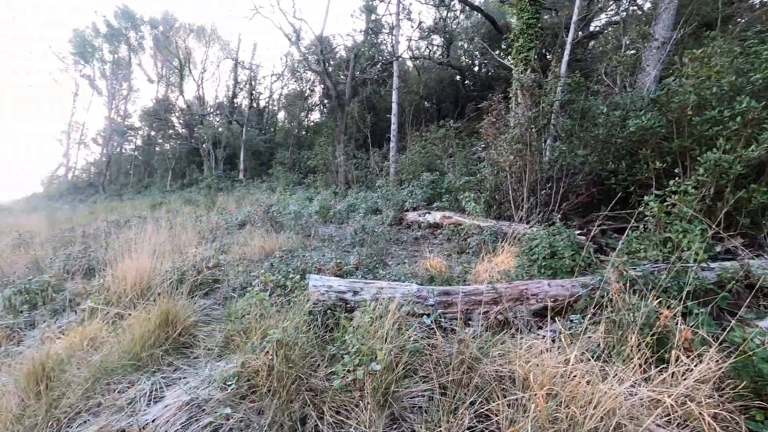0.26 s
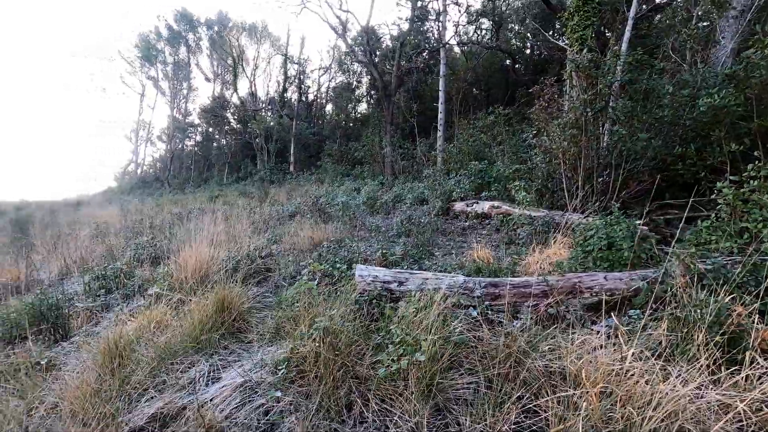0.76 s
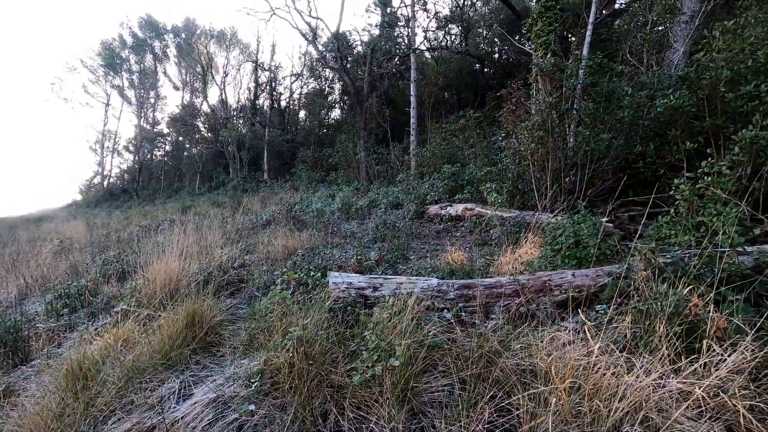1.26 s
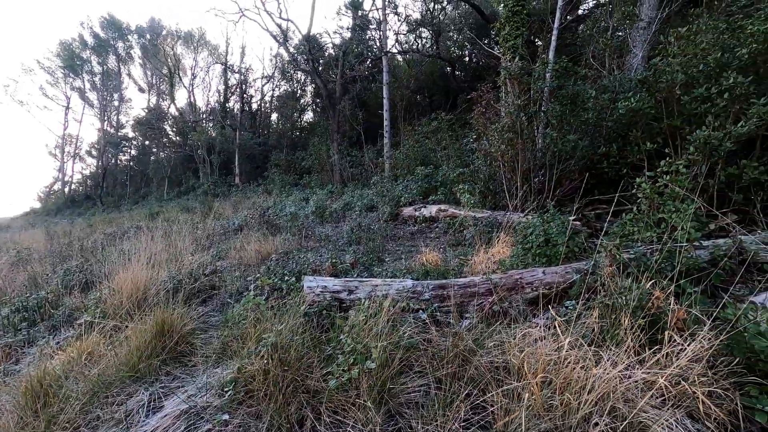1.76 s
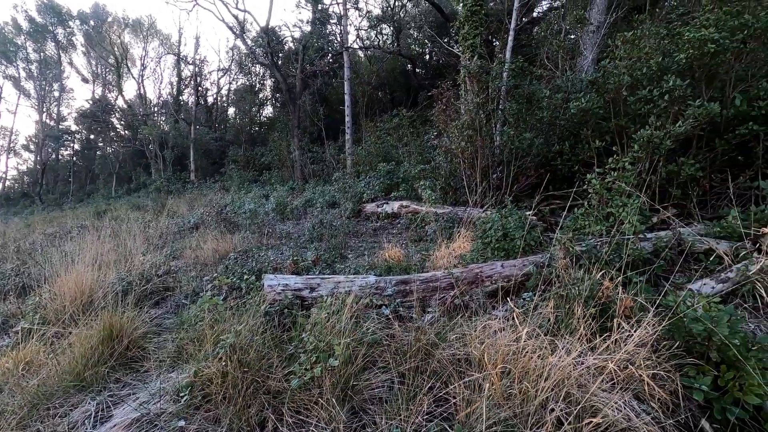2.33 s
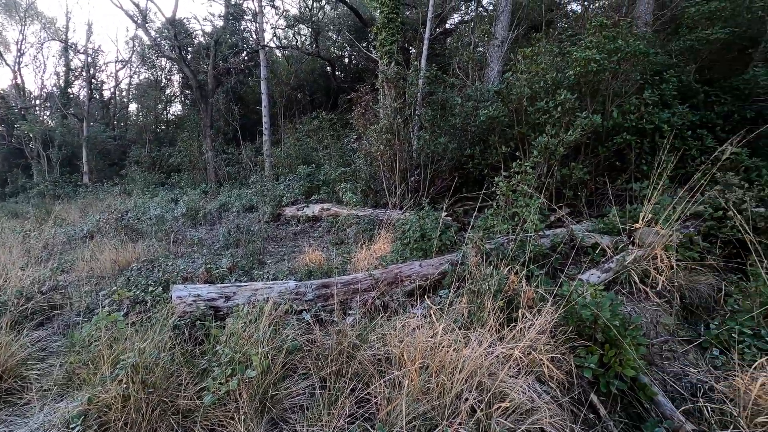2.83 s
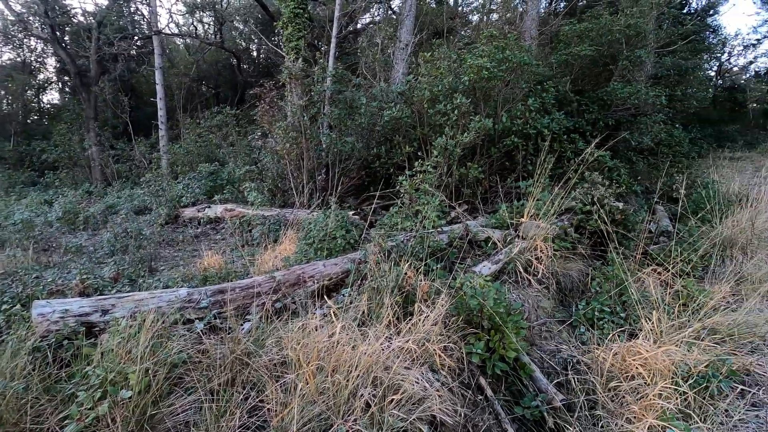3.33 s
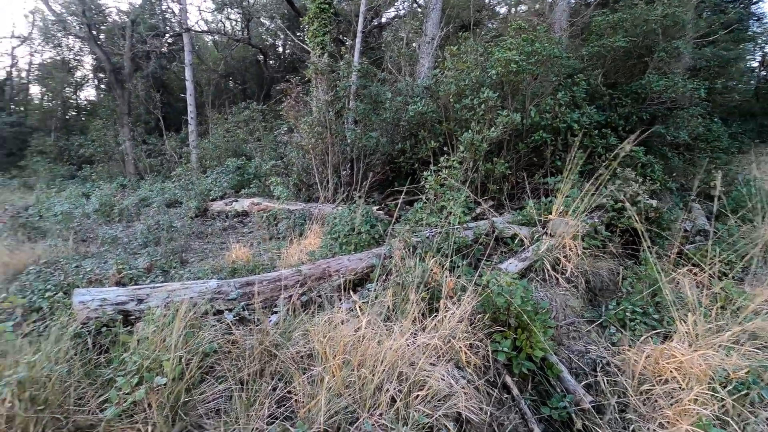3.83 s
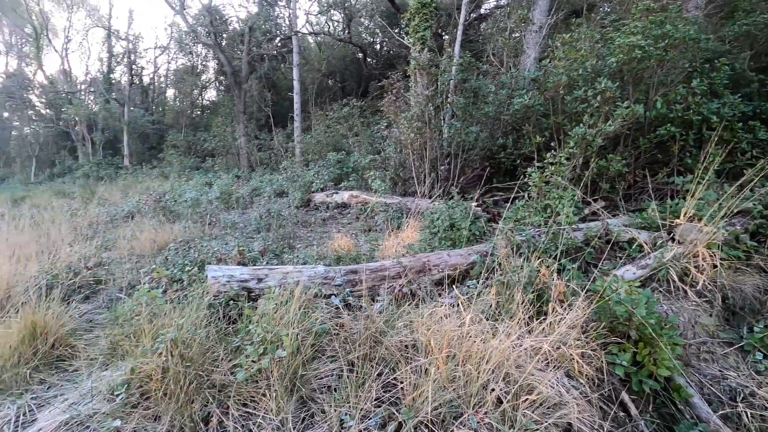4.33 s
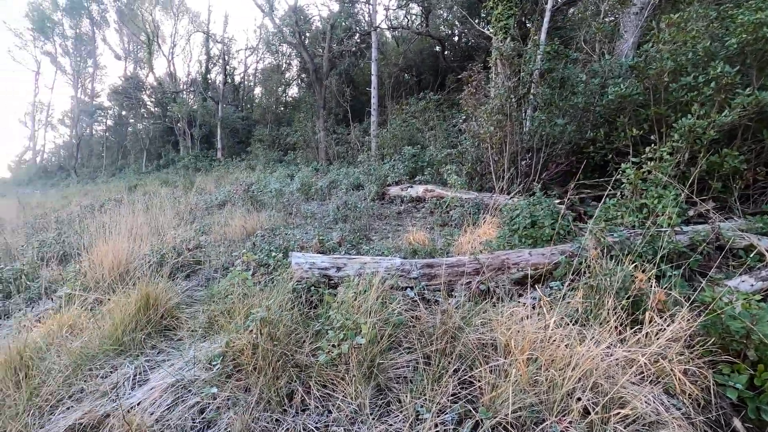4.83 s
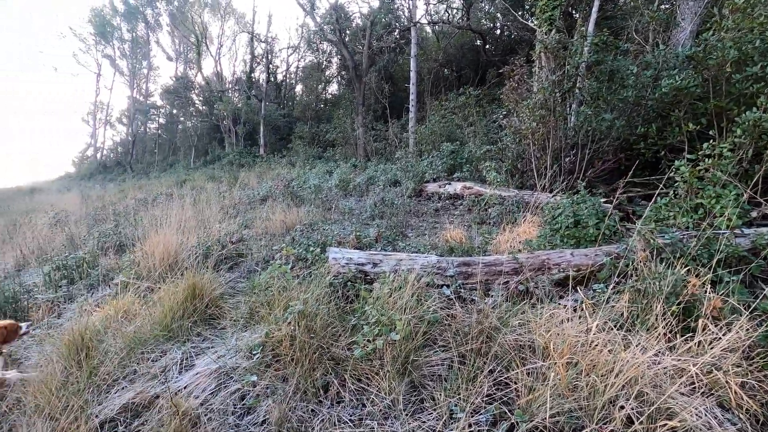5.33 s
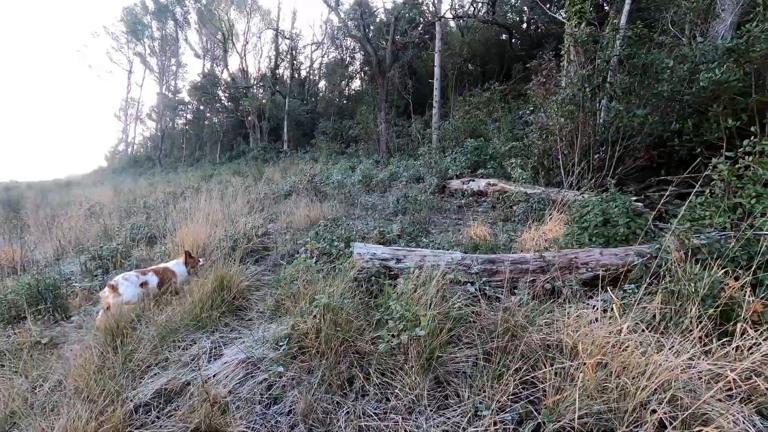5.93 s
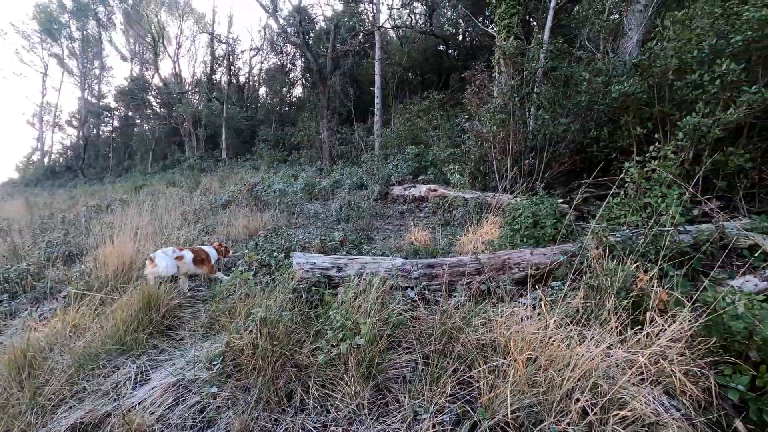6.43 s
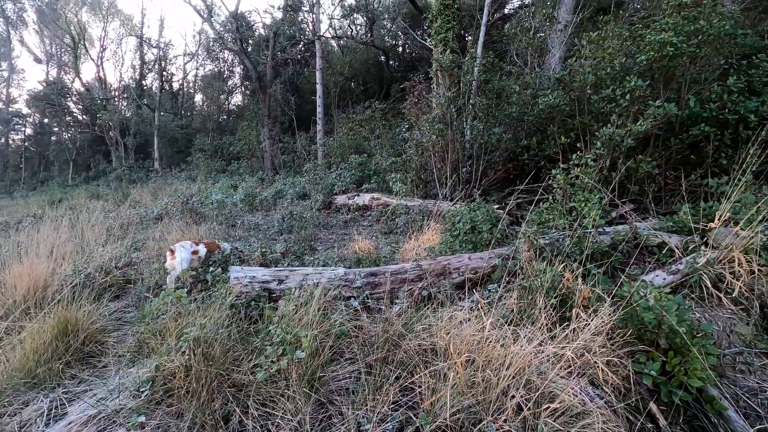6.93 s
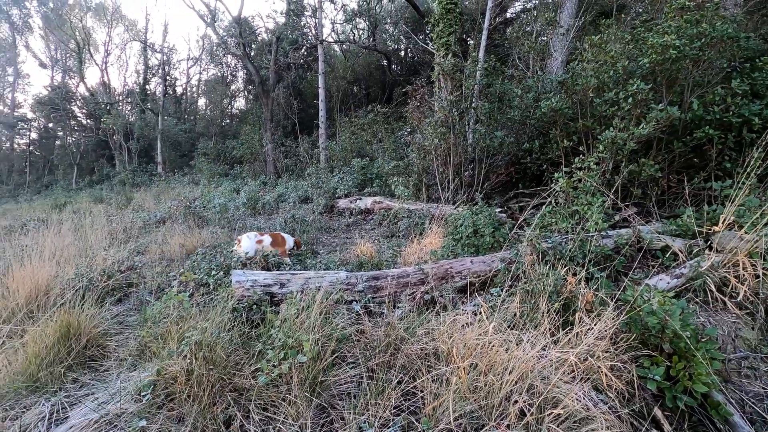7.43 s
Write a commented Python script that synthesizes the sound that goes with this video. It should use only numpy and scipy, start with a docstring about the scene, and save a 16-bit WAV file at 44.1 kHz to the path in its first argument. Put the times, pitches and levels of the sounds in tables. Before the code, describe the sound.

A small metal collar bell clanks and jangles irregularly as a dog moves through crackling dry grass, with wind rumbling on the microphone.

```python
"""A small sheet-metal bell swings on the collar of a dog hunting through dry grass at a wood's edge.
Its clapper strikes, bounces and rattles; each blow cuts off the last ring and starts split pairs of modes.
Stems crackle, steps crunch and twigs snap: all are sparse random fractures or bursts of coloured noise.
Gusts rumble, flutter and slap on the hand-held microphone, over a faint hush of distant air in the trees.
The wood's edge returns a faint tail of the bell, and the recorder cuts the extreme top."""
import sys
import numpy as np
from scipy import signal
from scipy.fft import rfft, irfft
from scipy.io import wavfile
from scipy.ndimage import uniform_filter1d

SR = 44100
rng = np.random.default_rng(int(sys.argv[2]) if len(sys.argv) > 2 else 0)


def bounce(signal):
    """Save signal as a 16-bit WAV file at the path given by the first command-line argument."""
    frames = np.transpose(np.atleast_2d(signal))
    limited = np.clip(frames, -1, 1)
    pcm = np.round(limited * 32767).astype(np.int16)
    wavfile.write(sys.argv[1], SR, pcm)


N = 338275
TIME = np.arange(N) / SR


def undb(db):
    """Decibels to gain."""
    return 10 ** (np.asarray(db) / 20)


def unit(x):
    """Scale to rms 1."""
    return x / np.sqrt(np.mean(x ** 2))


def curve(table):
    """Each column of a table, joined by straight lines in time."""
    s, *columns = np.transpose(table)
    return [np.interp(TIME, s, column) for column in columns]


def colour(x, points, band=None):
    """Filter by a (Hz, dB) spectrum; white noise of rms 1 comes out with rms 1, counted inside any band given."""
    hz, db = np.transpose(points)
    f = np.arange(N // 2 + 1) * SR / N
    gain = undb(np.interp(np.log(f + 1), np.log(hz), db))
    gain = gain / np.maximum(f / hz[-1], 1) ** 4  # a steep fall above the last point
    inside = 1 if band is None else (f > band[0]) & (f < band[1])
    return irfft(rfft(x) * gain / np.sqrt(np.mean(gain ** 2 * inside)), N)


def smooth(x, seconds):
    """One-pole lag."""
    p = np.exp(-1 / (seconds * SR))
    return signal.lfilter([1 - p], [1, -p], x)


def walk(rate):
    """Random drift through `rate` new values a second, with a spread near 1."""
    knots = np.arange(int(TIME[-1] * rate) + 2)
    values = rng.standard_normal(4096)[knots % 4096]
    return 1.2 * np.interp(TIME * rate, knots, values)


def swell(s, length):
    """A bell-shaped hump in time, with `length` as its standard deviation."""
    return np.exp(-0.5 * ((TIME - s) / length) ** 2)


def swell_train(table):
    """The sum of humps from rows of (time [s], level [dB], length [s])."""
    return sum(undb(db) * swell(s, length) for s, db, length in table)


def grains(rate, spread_db):
    """Tiny fractures of very unequal size, about `rate` a second, rms 1."""
    sizes = undb(spread_db * np.minimum(rng.exponential(size=N), 4))
    return unit((rng.random(N) < rate / SR) * sizes * rng.standard_normal(N))


def eddies(points, band=None, even_s=0.0708):
    """Coloured turbulence, evened out in strength over a short window."""
    x = colour(rng.standard_normal(N), points, band)
    return x / np.sqrt(uniform_filter1d(unit(x) ** 2, int(even_s * SR)))


# the dog's strides throw the clapper against the shell; levels are relative:
# (time [s], hum level [dB], upper partials level [dB], clack level [dB], hum ring t60 [s])
STRIKES = [(0.064, -39, -62.5, -47.5, 0.23), (0.215, -46.5, -67, -48.5, 0.94), (0.389, -37, -77, -58, 0.07),
           (0.466, -51, -94, -60.5, 0.39), (0.581, -45, -64, -49, 0.24), (0.938, -33.5, -59, -40.5, 0.17),
           (1.08, -45.5, -68, -56, 0.36), (1.294, -42, -70, -43, 0.14), (1.308, -36.5, -57.5, -52, 0.92),
           (1.452, -43, -64, -59, 0.17), (1.682, -46, -84, -51, 0.3), (1.727, -37.5, -89, -55.5, 0.022),
           (1.925, -54.5, -67, -55, 1), (1.992, -44.5, -65.5, -50, 0.14), (2.124, -32.5, -65, -46.5, 0.33),
           (2.149, -34, -65.5, -49, 0.21), (2.379, -42, -64, -48, 1), (2.491, -39, -67, -47, 0.41),
           (2.53, -39.5, -84, -49, 0.13), (2.73, -38, -61, -47, 0.29), (2.756, -19.5, -46, -29, 0.072),
           (2.826, -36, -67, -46, 0.26), (2.882, -31, -56, -37.5, 1), (2.99, -28.5, -54, -44, 1),
           (3.035, -24, -61, -41.5, 0.27), (3.069, -32.5, -46, -32.5, 0.43), (3.103, -40.5, -46, -55, 0.42),
           (3.163, -29.5, -55, -35, 0.22), (3.178, -30, -44, -55, 0.26), (3.241, -27.5, -52, -36.5, 0.074),
           (3.444, -27.5, -60, -40.5, 0.088), (3.516, -35.5, -57, -68, 0.021),
           (3.623, -39.5, -57, -46.5, 0.17), (3.871, -48.5, -67, -47, 0.41),
           (4.142, -34.5, -52.5, -42, 0.21), (4.194, -32, -53, -40, 1), (4.245, -25, -45.5, -43.5, 0.1),
           (4.309, -42.5, -58.5, -45.5, 1), (4.384, -36.5, -50.5, -48, 0.3), (4.402, -30, -55, -61, 0.09),
           (4.431, -40, -47.5, -62, 0.35), (4.567, -27.5, -54.5, -37.5, 0.11),
           (4.716, -30.5, -54, -37.5, 0.076), (4.764, -36, -59, -44, 0.083), (4.908, -31, -57, -59, 0.086),
           (4.931, -40, -44.5, -46, 0.42), (5.067, -33, -51, -36, 0.64), (5.1, -29.5, -59, -45, 0.08),
           (5.155, -34.5, -56, -61, 0.1), (5.262, -30, -48.5, -39, 0.32), (5.296, -43.5, -44.5, -48, 0.51),
           (5.487, -41.5, -47, -47, 0.12), (5.622, -38.5, -49, -65, 0.26), (5.673, -46.5, -47, -53, 0.32),
           (5.732, -33.5, -42, -41.5, 0.17), (5.889, -36, -46.5, -49, 0.42),
           (6.049, -30.5, -51, -41, 0.096), (6.078, -25.5, -47, -41, 0.08), (6.217, -37, -48, -53, 0.28),
           (6.398, -43, -50.5, -49, 1), (6.44, -29, -48.5, -52, 0.18), (6.488, -30.5, -50, -44.5, 0.16),
           (6.552, -30.5, -58, -53, 0.6), (6.58, -35, -54.5, -64, 0.1), (6.666, -45, -62.5, -56, 0.11),
           (6.831, -28.5, -43, -39, 0.4), (6.871, -30, -44.5, -47, 0.23), (6.973, -33, -66, -42.5, 0.19),
           (7.003, -42.5, -51, -48, 0.35), (7.125, -44.5, -76, -47.5, 0.075),
           (7.413, -51.5, -72, -55.5, 0.35), (7.628, -57.5, -69, -53, 0.69)]
# after a pause the clapper grazes the shell just before it strikes
GRAZE_PAUSE_S, GRAZE_LEAD_S, GRAZE_DROP_DB, GRAZE_T60_S = 0.11, 0.02, 14.5, 0.71
# after each strike the loose clapper rattles on, ever more lightly, down to a faint tremble
RATTLE_MEDIAN_GAP_S, RATTLE_T60_S, RATTLE_SCATTER_DB = 0.036, 0.13, 3
RATTLE_HUM_DROP_DB, RATTLE_HUM_FADE_DB_PER_S = 12.5, 97
RATTLE_UPPER_DROP_DB, RATTLE_UPPER_FADE_DB_PER_S = 3.5, 129
RATTLE_CLACK_BELOW_HUM_DB = 8.5
# the tremble grows as the dog pushes into thicker grass: (dB in thin grass, dB per dB of rustle)
THIN_GRASS_DB, TREMBLE_HUM, TREMBLE_UPPER = -77.5, (-59.5, 0.33), (-78.5, 0.88)


def clapper(count=8):
    """All blows in the columns of STRIKES: a graze, the strike, then light rattles that keep the upper partials alive."""
    chance = rng.standard_normal((len(STRIKES), count, 2))
    times = [row[0] for row in STRIKES]
    previous, following = [-1] + times[:-1], times[1:] + [TIME[-1]]
    thickness_db = curve(BRUSH)[0] - THIN_GRASS_DB
    blows = []
    for strike, before, end, draws in zip(STRIKES, previous, following, chance):
        s, hum_db, upper_db, clack_db, t60 = strike
        if s - before > GRAZE_PAUSE_S:
            graze_db = [db - GRAZE_DROP_DB for db in (hum_db, upper_db, clack_db)]
            blows.append((s - GRAZE_LEAD_S, *graze_db, GRAZE_T60_S))
        blows.append((s, hum_db, upper_db, clack_db, t60))
        age = 0
        for gap, size in draws:
            age += RATTLE_MEDIAN_GAP_S * np.exp(0.3 * gap)
            if s + age >= end:
                break
            thickness = thickness_db[int((s + age) * SR)]
            least_hum, least_upper = (db + slope * thickness for db, slope in (TREMBLE_HUM, TREMBLE_UPPER))
            hum = max(hum_db - RATTLE_HUM_DROP_DB - RATTLE_HUM_FADE_DB_PER_S * age, least_hum)
            hum += RATTLE_SCATTER_DB * size
            upper = max(upper_db - RATTLE_UPPER_DROP_DB - RATTLE_UPPER_FADE_DB_PER_S * age, least_upper)
            # a louder hum rings on through the rattle
            still_ringing_db = hum_db - 60 * age / t60
            ring_db, ring_s = max((hum, RATTLE_T60_S), (still_ringing_db, t60))
            blows.append((s + age, ring_db, upper, hum - RATTLE_CLACK_BELOW_HUM_DB, ring_s))
    return np.array(sorted(blows))


# the bell's modes, mostly split pairs; partial 0-2 names the level they share:
# (frequency [Hz], relative level [dB], partial, greatest scatter per blow [dB], relative ring length [ratio])
BELL = [(2048, 0.5, 0, 1, 1), (2120, -16, 0, 5.5, 1), (4496, 1.5, 1, 3, 0.79), (4717, -5.5, 1, 11.5, 0.19),
        (7770, -4, 2, 1, 1), (7860, 1, 2, 3, 0.99), (11880, -18, 2, -1, 0.62), (12030, -16, 2, 10, 0.63),
        (12000, -26.5, 2, -4.5, 0.5)]
# the dog's path: (time [s], speed towards the microphone [m/s])
APPROACH = [(0, -0.26), (1.4, 2.68), (2.3, 1.16), (2.8, 3), (3.15, 2), (3.6, -0.65), (4.4, -0.3),
            (5.3, -2.5), (6.9, -0.5), (7.67, -5.5)]
# a bright blow favours the second partial over the third: (dB at a typical blow, dB per dB of brightness)
TYPICAL_UPPER_DB, SECOND_PARTIAL, THIRD_PARTIAL = -49, (-47, 1.07), (-49, 0.94)


def bell_ring(blows, contact_s=0.00086, kick_rad=0.803, upper_t60=0.26, waver_db=1.67, detune=0.001203, ring_db=1.18):
    """Each blow stops the shell's ring and starts a new one; the swinging mouth makes every partial waver."""
    s, hum_db, upper_db, _, t60 = blows.T
    brightness_db = upper_db - TYPICAL_UPPER_DB
    levels_db = [hum_db] + [db + slope * brightness_db for db, slope in (SECOND_PARTIAL, THIRD_PARTIAL)]
    blow = np.maximum(np.searchsorted(s, TIME, side="right") - 1, 0)  # the latest blow at each sample
    age = np.maximum(TIME - s[blow], 0)
    doppler = 1 + curve(APPROACH)[0] / 343  # speed of sound [m/s]
    ring = 0
    for hz, db, partial, scatter_db, length in BELL:
        partial = int(partial)
        size, turn, pitch = rng.standard_normal((len(s), 3)).T
        ring_s = length * (np.sqrt(t60 * upper_t60) if partial else t60)
        strength = undb(levels_db[partial] + db + scatter_db * np.tanh(size))
        start = strength * np.exp(1j * np.cumsum(kick_rad * turn))  # each blow also shifts the phase
        decay = np.exp(-np.log(1000) * age / ring_s[blow])
        envelope = smooth(start[blow] * decay, contact_s * (1 + 0.7 * partial))
        frequency = hz * doppler * (1 + detune * pitch[blow] + 0.001576 * walk(130))
        phase = 2 * np.pi * np.cumsum(frequency) / SR
        mode = np.sqrt(2) * np.imag(envelope * np.exp(1j * phase))
        ring = ring + mode * undb(waver_db * (1 + partial) / 2 * walk(45))
    return undb(ring_db) * ring


# air in the bell's mouth and short rings of the clapper: (frequency [Hz], width [Hz], relative level [dB])
CLACK = [(2087, 60, 6), (2297, 153, 4.5), (2520, 570, 1.5), (4756, 70, -9), (8030, 140, -15.5),
         (12300, 300, -39)]


def bell_clack(blows, bounce_s=0.0055, bounce_db=-1.0, scatter_db=3, clack_db=23.5, count=8):
    """The clapper bounces a few times after each blow; every contact pumps the air in the bell's mouth."""
    s, *_, level_db, _ = blows.T
    gaps = rng.exponential(size=(len(s), count))
    sizes = rng.standard_normal((len(s), count))
    gaps[:, 0] = sizes[:, 0] = 0  # the first contact is the blow itself
    when = s[:, None] + bounce_s * np.cumsum(gaps, axis=1)
    strength = undb(level_db[:, None] + bounce_db * np.arange(count) + scatter_db * sizes)
    contacts = np.zeros(N)
    np.add.at(contacts, np.clip((when * SR).astype(int), 0, N - 1), strength)
    t = TIME[:SR // 20]
    body = 0
    for k, (hz, width, db) in enumerate(CLACK):
        decay = np.sqrt(width) * np.exp(-np.pi * width * t)
        body = body + undb(db) * decay * np.sin(2 * np.pi * hz * t + k * np.pi)  # neighbours in opposite phase
    body = body * (1 - np.exp(-t / 0.00037))  # soft onset
    return undb(clack_db) * signal.fftconvolve(contacts, body / np.linalg.norm(body))[:N]


def trees(x, t60=0.31, onset_s=0.034, echo_db=-25):
    """The wood's edge scatters a faint tail back, as decaying noise with a gradual onset."""
    t = TIME[:SR]
    tail = rng.standard_normal(SR) * np.exp(-np.log(1000) * t / t60) * (1 - np.exp(-t / onset_s))
    return undb(echo_db) * signal.fftconvolve(x, tail / np.linalg.norm(tail))[:N]


# every jolt that strikes the bell also swishes the stems, set relative to the clack level in STRIKES
SWISH_DB, SWISH_ATTACK_S, SWISH_RELEASE_S = -20, 0.006, 0.019


def swishes():
    """A quick rise and slower fall of rustle at each jolt of the dog."""
    jolts = np.zeros(N)
    for s, _, _, clack_db, _ in STRIKES:
        jolts[int(s * SR)] = undb(clack_db + SWISH_DB)
    release = smooth(jolts, SWISH_RELEASE_S) * SWISH_RELEASE_S * SR
    return smooth(release, SWISH_ATTACK_S)


# thin and thick grass along the dog's path: (time [s], relative rustle level [dB], relative treble level [dB])
BRUSH = [(0.0, -78, -88), (1.26, -78, -96), (1.49, -74.5, -86.5), (2.31, -81.5, -87.5), (2.76, -76, -86),
         (2.91, -71, -82), (3.29, -59, -68.5), (3.69, -74, -81.5), (3.99, -73, -77.5), (4.64, -53.5, -58.5),
         (5.26, -67.5, -73.5), (5.7, -64, -73), (6.09, -56.5, -66), (6.37, -61, -67), (6.64, -71.5, -77.5),
         (7.11, -64.5, -86), (7.37, -74.5, -82), (7.67, -69, -81)]
# colour of the scraping stems: (frequency [Hz], relative level [dB])
GRASS = [(200, -44), (900, -6.5), (1500, 3.5), (3200, 4), (3900, 4), (5500, 5), (7000, 5), (8500, -1.5),
         (10000, -15), (12000, -46), (15500, -31)]


def brush(rate=3500, spread_db=2.0, flicker_db=3.0, grass_db=-0.84, tips_db=3.5, swish_tips_db=-13, width=0.44):
    """Stems scrape along the dog; the finest dry tips add a fizz that spreads left and right."""
    level_db, top_db = curve(BRUSH)
    swish = swishes()
    stem_gain = np.hypot(undb(level_db + grass_db), swish)
    tip_gain = np.hypot(undb(top_db + tips_db), undb(swish_tips_db) * swish)
    stems = colour(grains(rate, spread_db), GRASS, (5200, 7300))
    mid_tips = [(6000, -8.5), (8500, 1), (10700, -2.5), (11500, -8.0), (13300, -8.5), (15000, -20)]
    side_tips = [(5000, -18.0), (8500, -13), (10000, -18.5), (11500, 4), (13300, -2), (15000, -11.5)]
    mid = colour(grains(rate, spread_db), mid_tips)
    side = colour(grains(rate, spread_db), side_tips) * np.array([[1], [-1]])  # opposite in left and right
    flicker = undb(flicker_db * walk(40))
    return flicker * (stem_gain * stems + tip_gain * (mid + width * side))


# steps in dry grass: (time [s], thud and crunch level [dB], crackle level [dB], length [s])
STEPS = [(2.123, -55, -59, 0.02), (2.448, -53, -58.5, 0.027), (2.764, -50, -54.5, 0.038),
         (3.113, -54, -52, 0.047), (3.208, -67, -52.5, 0.073), (3.366, -55, -45, 0.0083),
         (3.454, -56, -57, 0.044), (3.758, -55, -63.5, 0.056), (3.93, -57, -64.5, 0.074),
         (4.128, -52.5, -64.5, 0.046), (4.355, -48, -59, 0.026), (4.61, -60.5, -55, 0.16),
         (5.946, -58.5, -59, 0.028), (7.19, -63, -87, .03), (7.265, -61, -64, 0.017),
         (7.532, -57, -51.5, 0.0067)]
# colour of the crushed grass: (frequency [Hz], relative level [dB])
CRUNCH = [(150, 8.5), (400, 2.5), (750, 5), (1000, -2), (1400, 3.5), (2000, -7.5), (3000, -25)]
# colour of the cracking stems: (frequency [Hz], relative level [dB])
CRACKLE = [(1200, -11), (2500, 9.5), (3400, 6.5), (4500, 1), (7000, -21), (12000, -29)]


def steps(rate=2500, spread_db=4.0):
    """A foot crushes the matted grass below and cracks the stems on top."""
    crunch = swell_train([(s, db, length) for s, db, _, length in STEPS])
    crackle = swell_train([(s, db, length) for s, _, db, length in STEPS])
    crushed = crunch * colour(grains(rate, spread_db), CRUNCH)
    cracked = crackle * colour(grains(rate, spread_db), CRACKLE)
    return crushed + cracked


# snapping stems: (time [s], relative level [dB])
SNAPS = [(2.754, -47), (2.882, -46), (3.165, -37), (3.288, -33), (3.328, -33.5), (4.721, -21.5),
         (4.93, -38), (5.245, -34), (5.62, -41), (5.672, -35), (5.730, -33), (5.919, -27.5), (6.458, -35),
         (6.55, -36), (6.832, -34), (6.870, -55), (7.170, -43), (7.496, -40)]
# colour of a snap: (frequency [Hz], relative level [dB])
SNAP = [(800, -6), (2500, -6.5), (4000, -2), (7500, 1.5), (10000, -6), (15000, -21)]


def snaps(decay_s=0.0014, snap_db=-5):
    """Dry stems break in a millisecond or two, as quickly dying noise."""
    breaks = np.zeros(N)
    for s, db in SNAPS:
        breaks[int(s * SR)] = undb(db + snap_db)
    envelope = smooth(breaks, decay_s) * decay_s * SR
    return colour(envelope * rng.standard_normal(N), SNAP)


# breeze on the microphone, before its unsteadiness: (time [s], relative level [dB])
BREEZE = [(0, -47.5), (1.2, -42.5), (1.9, -58), (2.6, -45.5), (2.97, -59.5), (3.55, -47), (3.9, -49.5),
          (4.5, -44.5), (5.0, -50.5), (6.1, -42), (6.8, -25), (7.67, -36.5)]
# gusts on top of the breeze: (time [s], relative peak level [dB], length as standard deviation [s])
GUSTS = [(0.03, -36, 0.058), (0.23, -32, 0.062), (0.64, -37, 0.12), (1.6, -37.5, 0.065),
         (1.74, -40.5, 0.097), (2.14, -39, 0.13), (2.43, -38, 0.11), (4.27, -36.5, 0.084),
         (5.35, -34.5, 0.18), (5.81, -28.5, 0.064), (6.15, -33.5, 0.035), (6.345, -24.5, 0.028),
         (6.6, -26.5, 0.12), (6.8, -22.5, 0.024), (6.97, -22, 0.078), (7.18, -27.5, 0.022),
         (7.37, -29, 0.026)]
# colour of the rumble: (frequency [Hz], relative level [dB])
BUFFET = [(12, -0.5), (28, -2), (50, 2.5), (80, -1), (140, -8), (200, -13), (300, -28.5), (500, -72)]
# colour of the flutter: (frequency [Hz], relative level [dB])
FLUTTER = [(120, -6), (220, -0.5), (320, -4.5), (500, -18.5), (800, -21.5), (1400, -30.5), (3000, -69.5)]
# sharp slaps of wind: (time [s], level [dB], length as standard deviation [s])
SLAPS = [(0.175, -46, 0.0042), (0.253, -43, 0.018), (4.318, -38.5, 0.032), (6.345, -42, 0.004),
         (6.84, -11.5, 0.0066), (6.96, -21.5, 0.013), (7.01, -23.5, 0.0093)]
# colour of a slap: (frequency [Hz], relative level [dB])
SLAP = [(30, 6), (120, 6.5), (220, 4), (400, -8), (700, -17.5), (1200, -37), (3000, -50)]
# the flutter is set below the rumble and gains on it in strong wind
FLUTTER_DB, FLUTTER_KNEE_DB = -20, -7.5


def wind(buffet_db=0.7, unsteady_db=2.5):
    """Large eddies rumble on the microphone, small ones flutter, and a few slap it."""
    strength = np.hypot(undb(curve(BREEZE)[0]), swell_train(GUSTS))
    strength = strength * undb(unsteady_db * walk(22))
    rumble = undb(buffet_db) * strength * eddies(BUFFET)
    flutter_gain = undb(FLUTTER_DB) * strength * (1 + strength / undb(FLUTTER_KNEE_DB))
    flutter = flutter_gain * eddies(FLUTTER)
    slaps = swell_train(SLAPS) * eddies(SLAP, even_s=0.053)
    return rumble + flutter + slaps


# colour of the distant air: (frequency [Hz], relative level [dB])
HUSH = [(100, -31), (300, 8), (600, -0.5), (1000, -5), (1700, -5), (2600, -13), (4000, -32), (7500, -50),
        (10000, -56), (15000, -47)]


def hush(hush_db=-59.5, sway_db=0.6):
    """Distant air in the trees: coloured noise with a slow sway in level."""
    return undb(hush_db + sway_db * walk(1.52)) * colour(rng.standard_normal(N), HUSH)


def scene():
    """Bell, grass and wind at the microphone; everything sits in the middle but the finest rustle."""
    surroundings = brush() + steps() + snaps() + wind() + hush()
    blows = clapper()
    bell = bell_ring(blows) + bell_clack(blows)
    return bell + trees(bell) + surroundings


def record(dry):
    """The recorder cuts the top with a steep low-pass filter."""
    top_hz = 15650
    low_pass = signal.ellip(10, 0.2, 80, top_hz, fs=SR, output="sos")  # order, ripple [dB], rejection [dB]
    return signal.sosfilt(low_pass, dry)


dry = scene()
out = record(dry)
bounce(out)
```